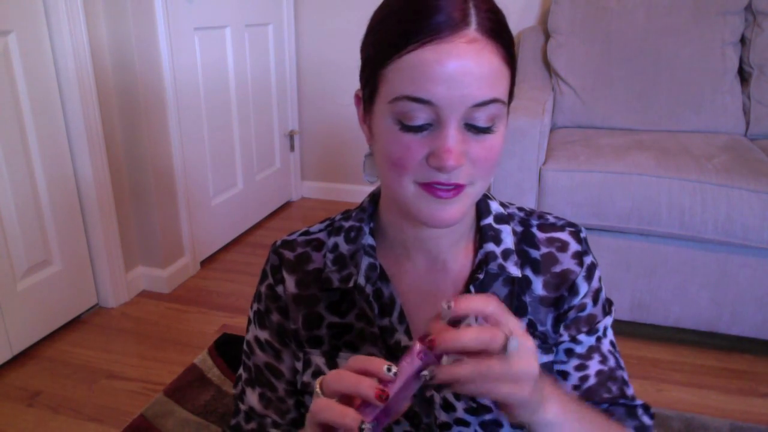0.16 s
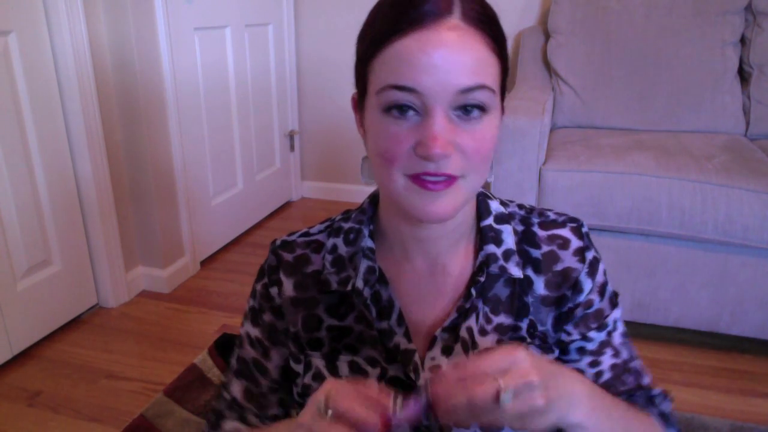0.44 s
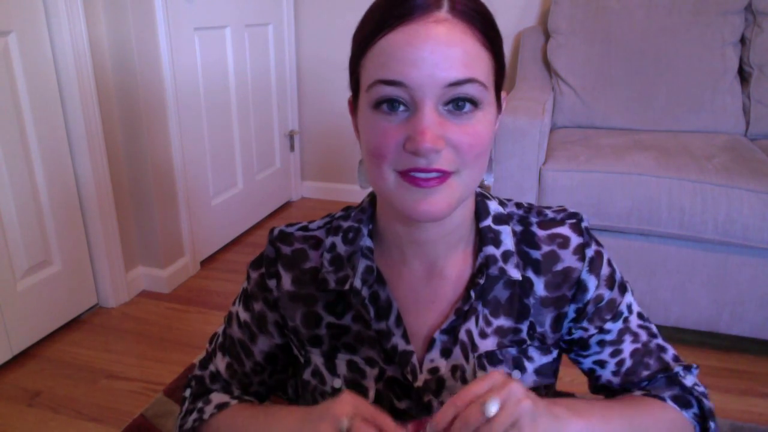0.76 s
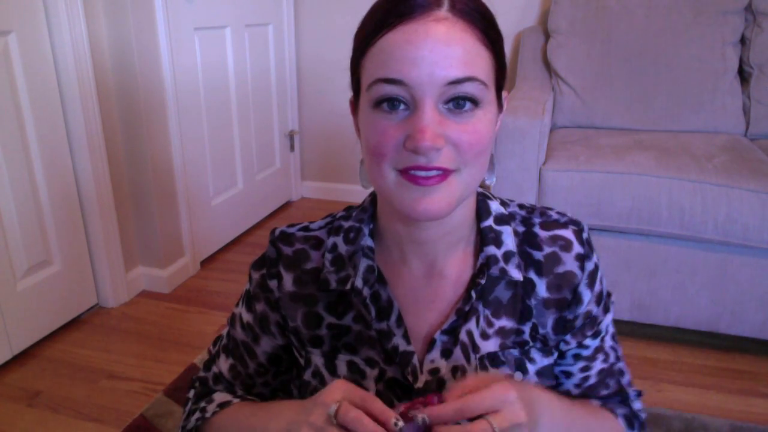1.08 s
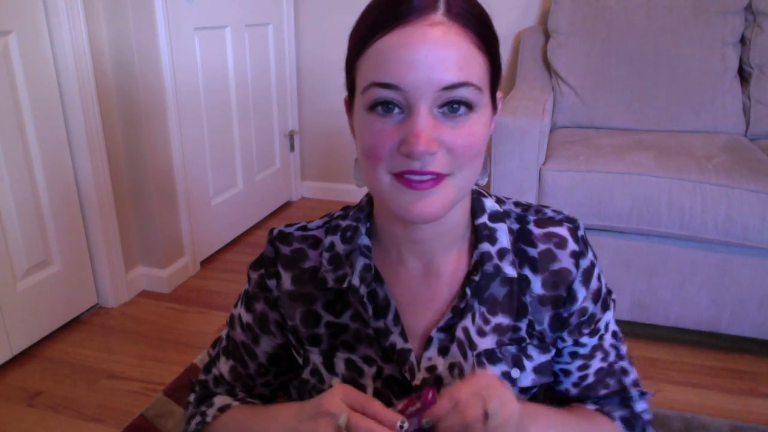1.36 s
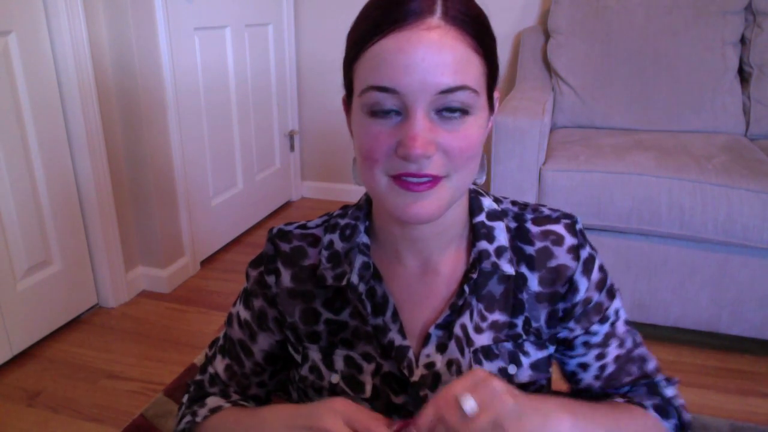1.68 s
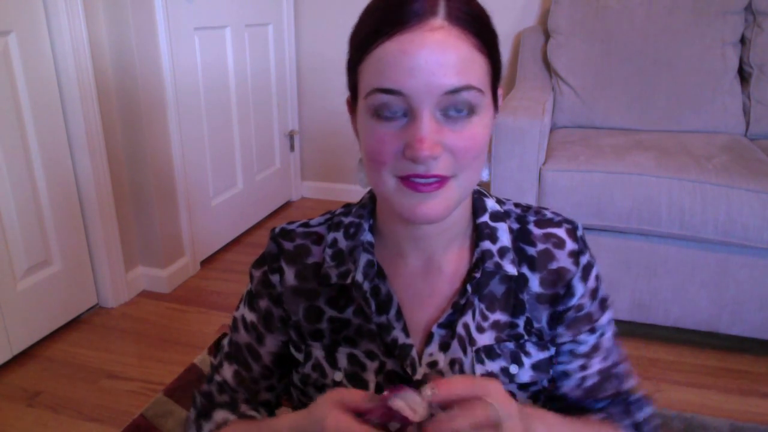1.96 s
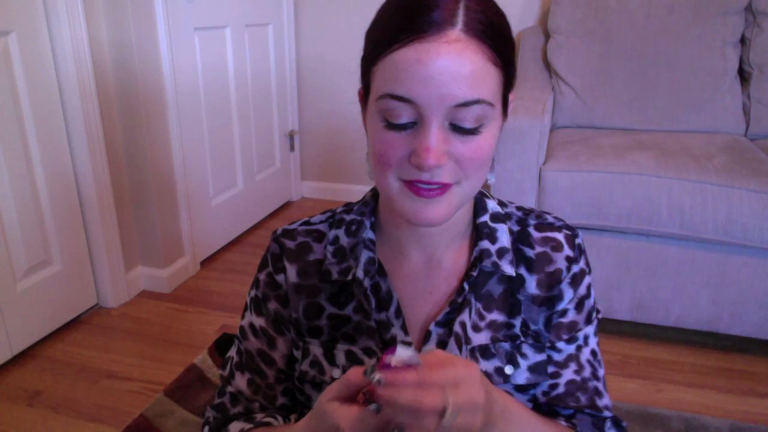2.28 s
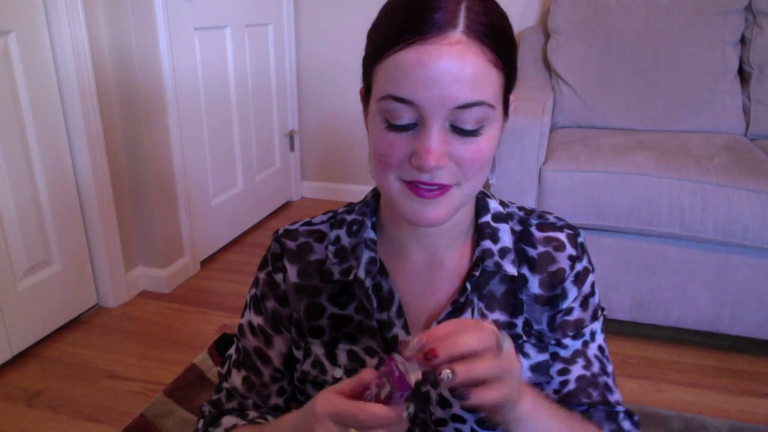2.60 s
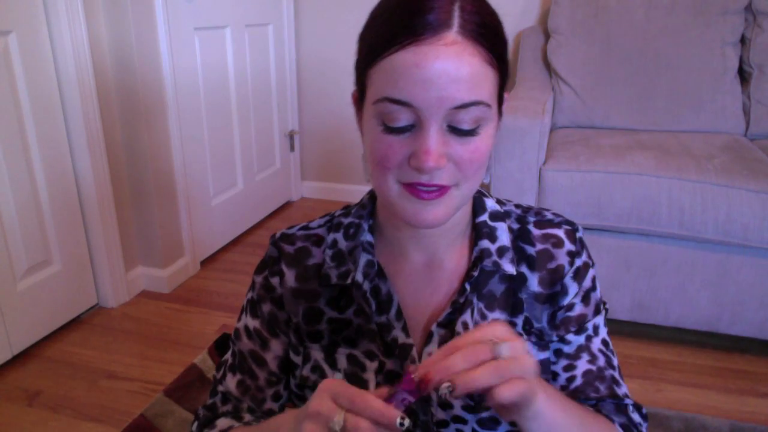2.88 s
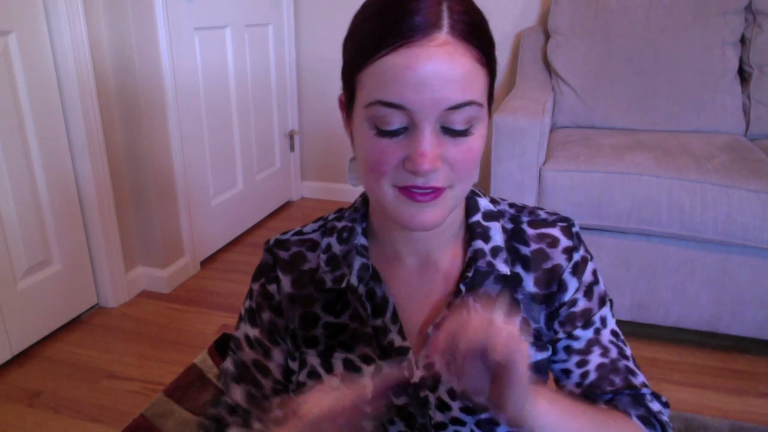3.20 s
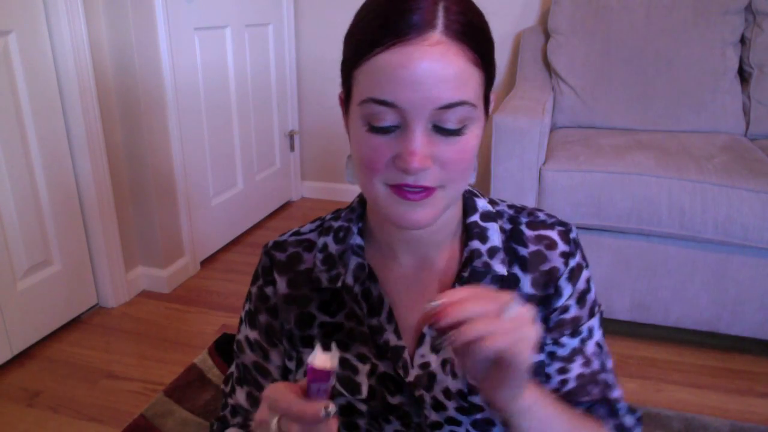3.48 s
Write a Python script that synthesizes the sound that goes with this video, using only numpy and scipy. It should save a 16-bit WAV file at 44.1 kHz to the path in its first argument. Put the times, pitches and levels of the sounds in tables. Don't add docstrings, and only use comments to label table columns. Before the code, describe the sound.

Crinkling plastic film ticks, then snaps sharply, loudest near the end, over a faint fan hum.

```python
import sys
import numpy as np
from scipy import signal
from scipy.io import wavfile
from scipy.ndimage import uniform_filter1d

SR = 44100
rng = np.random.default_rng(int(sys.argv[2]) if len(sys.argv) > 2 else 0)


def bounce(signal):
    frames = np.transpose(np.atleast_2d(signal))
    limited = np.clip(frames, -1, 1)
    pcm = np.round(limited * 32767).astype(np.int16)
    wavfile.write(sys.argv[1], SR, pcm)


def magnitude_from_level(level_db):
    exponent = np.asarray(level_db, float) / 20
    return 10 ** exponent


N = 160965

FACING_DB_PER_DB, FACING_FLOOR_DB = .27, -20


def rms_one(x):
    return x / np.sqrt(np.mean(x ** 2) + 1e-20)


def at_hz(points, hz):
    table = np.array(points)
    return np.interp(np.log(hz), np.log(table[:, 0]), table[:, 1])


def resonance(x, hz, width_hz):
    r = np.exp(-np.pi * width_hz / SR)
    feedback = [1, -2 * r * np.cos(2 * np.pi * hz / SR), r * r]
    return signal.lfilter([(1 - r * r) / 2, 0, (r * r - 1) / 2], feedback, x)


def edge(x, hz, q, high):
    w = 2 * np.pi * hz / SR
    c, a = np.cos(w), np.sin(w) / (2 * q)
    if high:
        b = [(1 + c) / 2, -1 - c, (1 + c) / 2]
    else:
        b = [(1 - c) / 2, 1 - c, (1 - c) / 2]
    return signal.lfilter(b, [1 + a, -2 * c, 1 - a], x)


def bands(size):
    edges = 28 * 2 ** np.arange(0, 9.6, .5)
    white = rng.standard_normal((2, size))
    out = []
    for k, (low, high) in enumerate(zip(edges, edges[1:])):
        sos = signal.butter(2, [low, high], "band", fs=SR, output="sos")
        out.append((np.sqrt(low * high), signal.sosfilt(sos, white[k % 2])))
    return out


def film(push, low_hz, high_hz):
    edge_q, skirt_q, mode_q, mode_db = 1.21, 0.6, 10.0, 4
    above = edge(push, low_hz, edge_q, True)
    above = edge(above, low_hz / 1.66, skirt_q, True)
    band = edge(above, high_hz, edge_q, False)
    band = edge(band, min(high_hz * 0.98, 18000), skirt_q, False)
    modes = sum(resonance(band, hz, hz / mode_q) for hz in (low_hz, high_hz))
    return band + (magnitude_from_level(mode_db) - 1) * modes


def creases(rows, facing):
    snap_s, rag_share, rag_loss_per_db = .0012, .45, .5
    high_hz_centre, high_q, top_hz, top_width_hz, top_db = 10600, 4.2, 13500, 4500, -9
    out = np.zeros((2, N + 600))
    t = np.arange(512) / SR
    rags = rng.standard_normal((len(rows), len(t)))
    for (s, db, low_hz, high_hz, high_db), rag in zip(rows, rags):
        held_db = max(db, FACING_FLOOR_DB)
        rag_level = rag_share * magnitude_from_level(-rag_loss_per_db * (held_db - FACING_FLOOR_DB))
        push = np.array([rag_level * rag * np.exp(-t / snap_s), 0 * t])
        push[:, 0] = 1

        top = resonance(resonance(push, top_hz, top_width_hz), top_hz, top_width_hz)
        high = resonance(push, high_hz_centre, high_hz_centre / high_q) + magnitude_from_level(top_db) * top
        parts = film(push, low_hz, high_hz), edge(high, 8500, .7, True)
        main, high = [np.array([p[0], p[1] * p[0].std() / p[1].std()]) / np.abs(p[0]).max() for p in parts]

        level = magnitude_from_level(db + np.array([[facing * held_db], [0]]))
        i = int(s * SR)
        out[:, i:i + len(t)] += level * (main + magnitude_from_level(high_db) * high)
    return out[:, :N]


def loud_snaps():
    # start in seconds, peak in dB, lowest ring in Hz, highest ring in Hz, high part in dB
    snap_rows = [(.5390, -32.5, 2600, 6840, -25), (.5628, -27, 3300, 5300, -23),
                 (.9952, -17, 3100, 4400, -14), (1.0030, -17.5, 3200, 7100, -11.5),
                 (1.3995, -35, 1630, 2400, -45), (1.5465, -21.5, 3600, 6000, -34),
                 (1.5522, -20.5, 4240, 6920, -10.5), (1.8680, -25.5, 2900, 4940, -28),
                 (2.1880, -28.5, 2150, 5500, -44), (2.3380, -27, 1400, 5200, -48),
                 (2.7230, -28, 3000, 5900, -20), (2.7300, -39, 2500, 6130, -12),
                 (2.9728, -33.5, 3200, 6050, 7), (2.9828, -32, 3500, 5940, -4),
                 (3.0095, -1, 4150, 5500, -9.5), (3.1672, -13.5, 2200, 5820, -5),
                 (3.1739, -12, 2510, 3700, -21), (3.2131, -16, 2000, 4800, 0)]
    return creases(snap_rows, FACING_DB_PER_DB)


def near_creases():
    # start in seconds, peak in dB, lowest ring in Hz, highest ring in Hz, high part in dB
    near_rows = [(.1504, -44, 3350, 3800, -17), (.3300, -48.5, 1000, 4680, -26),
                 (.7635, -43.5, 2150, 5300, -20), (.7918, -43.5, 5000, 5300, -12),
                 (.8180, -45, 2310, 5200, -10), (1.4053, -35.5, 1580, 2260, -45),
                 (1.5555, -32.5, 3480, 6440, -23), (1.5612, -31.5, 4250, 6500, -12),
                 (2.1945, -35, 2100, 3350, -45), (2.3435, -30, 1550, 3550, -45),
                 (2.3618, -31.5, 1610, 2350, -45), (3.0435, -21, 2000, 4700, -19),
                 (3.0850, -37.5, 1190, 2800, -6), (3.1800, -26, 1290, 5500, -2),
                 (3.2025, -29, 1900, 2800, -7), (3.2295, -26, 1500, 3970, -11)]
    return creases(near_rows, -.3)


def faint_ticks():
    # start in seconds, peak in dB, lowest ring in Hz, highest ring in Hz, high part in dB
    tick_rows = [(.0990, -46, 3050, 6350, -6), (.2054, -49, 1200, 2440, -13),
                 (.2543, -44.5, 3900, 6360, -13), (.7462, -48.5, 2200, 5800, -17),
                 (1.0922, -31.5, 2280, 6950, -26), (1.2218, -34, 1650, 2310, -26),
                 (1.3064, -41.5, 1300, 2140, -15), (1.3743, -46, 2580, 4470, -30),
                 (1.4655, -38, 2000, 3370, -18), (1.5319, -43, 2330, 5150, -25),
                 (1.6458, -39.5, 2140, 4180, -27), (1.7494, -42.5, 2080, 4100, -24),
                 (2.0580, -40.5, 2420, 3900, -35), (2.1130, -47, 3960, 5000, -8),
                 (2.1275, -33, 2180, 5700, -25), (2.2752, -36, 3200, 5530, -24),
                 (2.4772, -36.5, 2000, 5900, -0.5), (2.8122, -37, 4730, 6600, -8.5),
                 (3.4810, -49, 1410, 2480, -20.5)]
    return creases(tick_rows, .12)


def facets():
    # start in seconds, peak in dB, pitch in Hz, width in Hz
    ring_rows = [(.9952, -27, 1550, 300), (2.1884, -26, 1500, 500), (2.1882, -31, 5300, 700),
                 (3.1545, -47, 10700, 400), (3.2133, -22, 5400, 600), (1.5522, -32, 8800, 900),
                 (2.7300, -38, 1900, 600), (2.8120, -50, 14200, 500), (2.5610, -46, 2500, 1500),
                 (.1180, -48, 3200, 350), (1.3994, -26, 1570, 350), (1.3995, -27.5, 2090, 400),
                 (1.401, -33.5, 4530, 500), (2.1880, -20, 2130, 370), (2.1881, -18.5, 3320, 300),
                 (2.1886, -30, 4420, 300), (2.3380, -19, 1520, 300), (2.3381, -21.5, 2320, 300),
                 (2.3380, -23, 3490, 400), (3.0098, -20.5, 2167, 250.4), (3.0099, -22, 2680, 260),
                 (3.0112, -19, 1193, 316), (3.0093, -18, 5950, 300), (3.011, -16.5, 6760, 419),
                 (3.2131, -14, 1640, 260), (3.2133, -13, 2730, 320), (3.2132, -10, 3750, 750),
                 (.1120, -37, 3200, 350), (0.098, -52, 10600, 300), (.2310, -53, 10800, 600),
                 (.2545, -57, 11800, 500), (2.2752, -37, 10600, 900)]
    out = np.zeros((2, N))
    kick = np.r_[1, np.zeros(1023)]
    for s, db, hz, width_hz in ring_rows:
        ring = resonance(resonance(kick, hz, width_hz), hz, hz / 2)
        facing_db = FACING_DB_PER_DB * max(db, FACING_FLOOR_DB)
        level = magnitude_from_level(db + np.array([[facing_db], [0]]))
        i = int(s * SR)
        out[:, i:i + len(kick)] += level * ring / np.abs(ring).max()
    return out


def rubbing():
    # start in seconds, length in seconds, level in dB, lowest pitch in Hz, highest pitch in Hz
    rub_rows = [(0.101, 0.069, -76.5, 10200, 10300), (0.114, 0.041, -66, 3020, 3760),
                (0.538, 0.037, -51.5, 5500, 7340), (0.756, 0.14, -57.5, 2120, 2440),
                (0.753, 0.049, -55.5, 3260, 4280), (0.781, 0.083, -57.5, 4800, 5600),
                (0.803, 0.12, -62, 3000, 4170), (0.811, 0.084, -61, 7000, 9000),
                (0.783, 0.099, -63.5, 9900, 14500), (0.895, 0.067, -64, 4170, 4550),
                (1.195, .03, -63, 6400, 7100), (1.057, 0.051, -54.5, 2560, 5420),
                (1.867, 0.017, -52.5, 6600, 9900), (1.861, .03, -63, 14000, 15300),
                (2.12, 0.025, -61, 5300, 11000), (2.27, 0.023, -59, 7400, 9900),
                (2.487, 0.054, -52, 4700, 6740), (2.488, 0.059, -60.5, 8620, 13500),
                (2.714, 0.013, -49.5, 4870, 6250), (2.716, 0.022, -56, 10100, 12600),
                (2.815, 0.016, -60.5, 5200, 11400), (2.889, 0.035, -53.5, 4500, 6530),
                (2.896, 0.02, -61, 8800, 12000), (2.97, .03, -64.5, 9800, 14500),
                (3.181, 0.051, -39.5, 4200, 10540), (2.489, 0.071, -58, 1650, 3400),
                (0.537, 0.022, -64, 12800, 15000)]
    grains_per_s, grain_spread_db, hiss_share = 2200, 3.5, .3
    facet_q, bed_db = 20, -9
    out = np.zeros(N)
    for s, length, db, low_hz, high_hz in rub_rows:
        i = np.arange(int(length * SR))
        chance = rng.random((4, len(i)))
        sizes = magnitude_from_level(grain_spread_db * np.minimum(-np.log(chance[0]), 4)) * np.sign(chance[1] - .5)
        cracks = sizes * (chance[2] < grains_per_s / SR)
        swell = np.sin(np.pi * i / len(i)) ** 0.39
        grains = (cracks + hiss_share * (chance[1] - .5)) * swell

        facet = (chance[3] * 4).astype(int)
        rings = 0
        for k, hz in enumerate(np.geomspace(low_hz, high_hz, 4)):
            ring = resonance(grains * (facet == k), hz, hz / facet_q)
            rings = rings + resonance(ring, hz, hz / 2)
        bed = film(grains, low_hz, high_hz)
        out[i + int(s * SR)] += magnitude_from_level(db) * (rms_one(rings) + magnitude_from_level(bed_db) * rms_one(bed))
    return out


def knocks():
    # start in seconds, peak in dB, pitch in Hz
    knock_rows = [
        (0.566, -45, 910),
        (1.2211, -42, 800),
        (2.188, -27, 840),
        (2.4772, -42, 600),
        (3.0115, -23, 740),
        (3.215, -20, 888),
        (3.2160, -39, 450),
    ]
    q = 0.88
    out = np.zeros(N)
    kick = np.r_[1, np.zeros(511)]
    for s, db, hz in knock_rows:
        thud = resonance(resonance(kick, hz, hz / q), hz, hz / q)
        i = int(s * SR)
        out[i:i + len(kick)] += magnitude_from_level(db) * thud / np.abs(thud).max()
    return out


def room(x):
    # frequency in Hz, time to fall 60 dB in seconds
    decay_times = [(500, 0.41), (2000, 0.25), (5000, 0.26), (9000, 0.22), (15000, 0.23)]
    # frequency in Hz, tail level in dB
    colour = [(500, -5), (1500, -2), (4000, 5), (8000, 8), (15000, -6)]
    # delay in seconds, level in dB
    echo_rows = [(.0063, -16.5), (.0155, -20.5), (.0235, -22), (.0365, -16.5)]
    tail_db, rise_s, grain = -35, .007, 0.35
    t = np.arange(SR // 2) / SR
    tail = 0
    for hz, band in bands(size=len(t)):
        lumps = np.exp(grain * rms_one(uniform_filter1d(rng.standard_normal(len(t)), size=60)))
        fall_db = 60 * t / at_hz(decay_times, hz)
        tail = tail + magnitude_from_level(at_hz(colour, hz) - fall_db) * band * lumps
    reply = magnitude_from_level(tail_db) * tail * (1 - np.exp(-(t / rise_s) ** 2))
    for s, db in echo_rows:
        reply[int(s * SR) + np.array([0, 31])] += magnitude_from_level(db) * np.array([1, -.6])
    return signal.fftconvolve(x, reply)[:N]


def fan():
    # frequency in Hz, level in dB per Hz
    hiss_curve = [(24, -33), (40, -28.5), (124, -1), (646, -13.5), (942, 3), (1090, -15), (1760, -10),
                  (2000, -13.5), (16000, -34)]
    # frequency in Hz, width in Hz, lift in dB
    housing = [(104, 30, 8), (248.7, 32, 5.5), (838, 240, 9.5), (1710, 200, 6)]
    level_db, flicker_db = -59.5, 1.2
    knots = np.arange(0, N, 4096)
    out = 0
    for hz, band in bands(size=N):
        flicker = np.interp(np.arange(N), knots, rng.standard_normal(len(knots)))
        out = out + magnitude_from_level(at_hz(hiss_curve, hz) + flicker_db * flicker) * band
    for hz, width_hz, db in housing:
        out = out + (magnitude_from_level(db) - 1) * resonance(out, hz, width_hz)
    return magnitude_from_level(level_db) * rms_one(out)


def scene():
    wrapper = loud_snaps() + near_creases() + faint_ticks() + facets()
    direct, to_room = wrapper + rubbing() + knocks()
    notch_hz, notch_width_hz, notch_share = 8120, 1600, 0.94
    direct = direct - notch_share * resonance(direct, notch_hz, notch_width_hz)
    return (direct + room(to_room) + fan())[None]


def roll_off(x):
    return signal.sosfilt(signal.butter(12, 16670, fs=SR, output="sos"), x)


def record(dry):
    heard = edge(dry, 14500, .7, False)
    band_limit = signal.cheby2(12, 70, 16800, fs=SR, output="sos")
    return roll_off(signal.sosfilt(band_limit, heard))


dry = scene()
out = record(dry)
bounce(out)
```